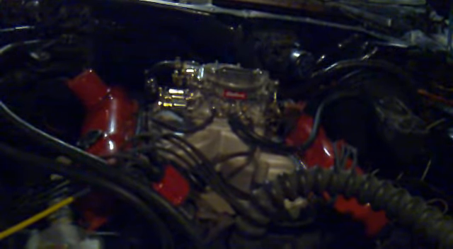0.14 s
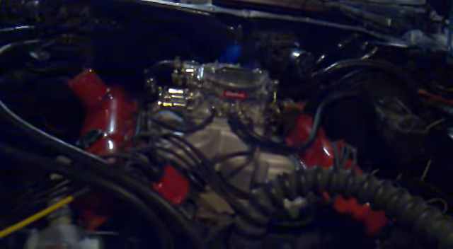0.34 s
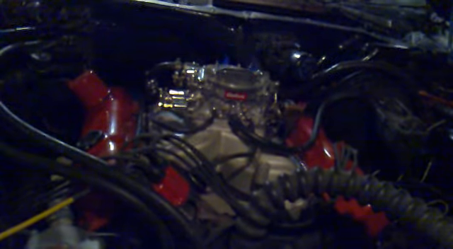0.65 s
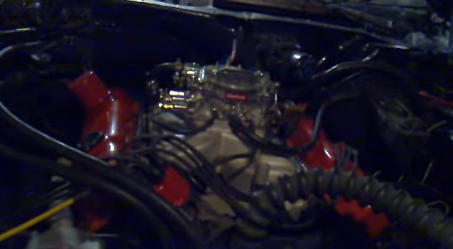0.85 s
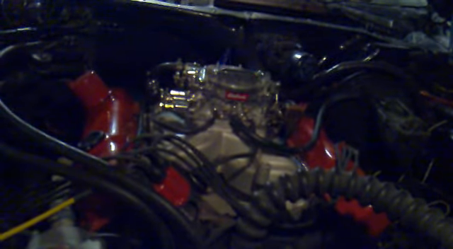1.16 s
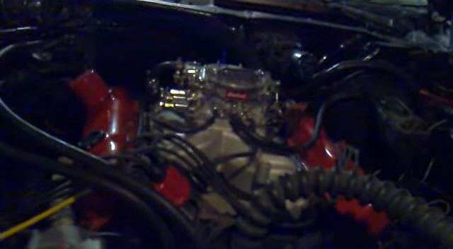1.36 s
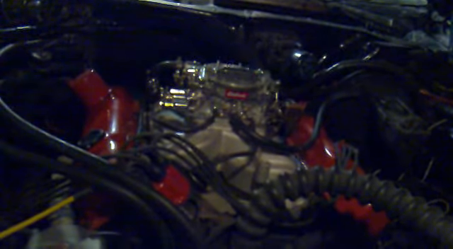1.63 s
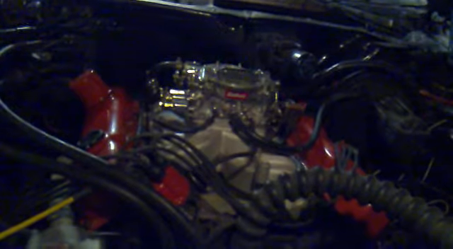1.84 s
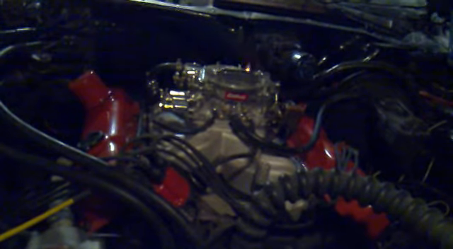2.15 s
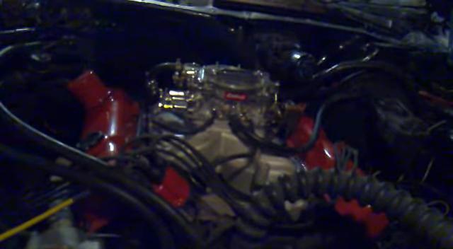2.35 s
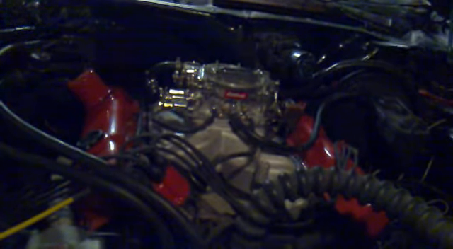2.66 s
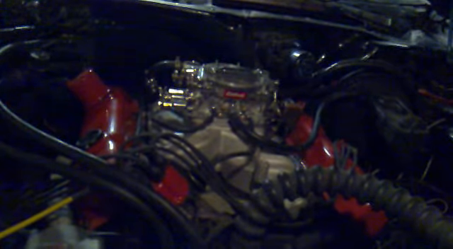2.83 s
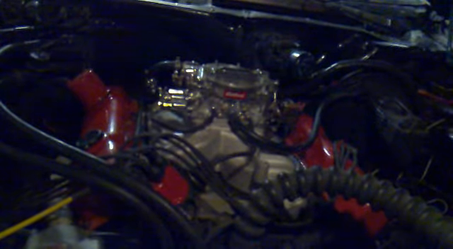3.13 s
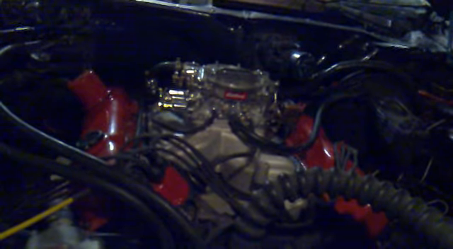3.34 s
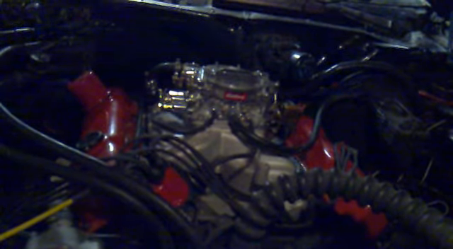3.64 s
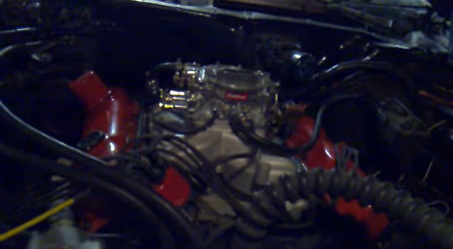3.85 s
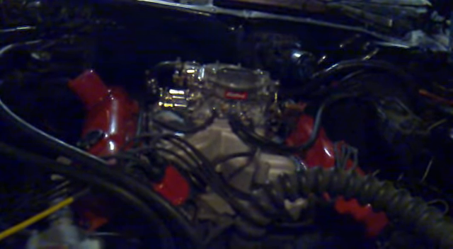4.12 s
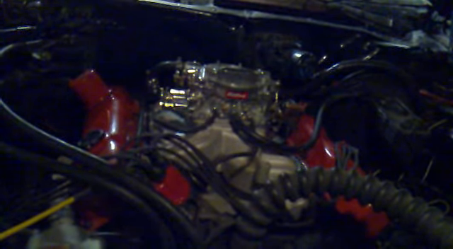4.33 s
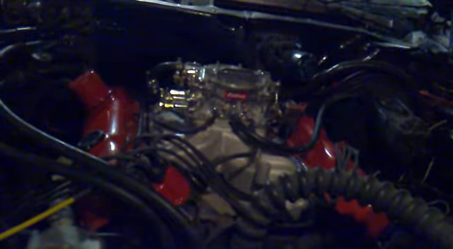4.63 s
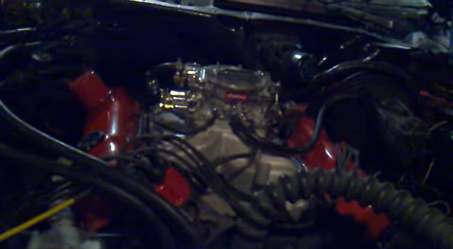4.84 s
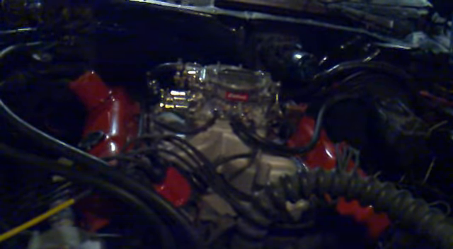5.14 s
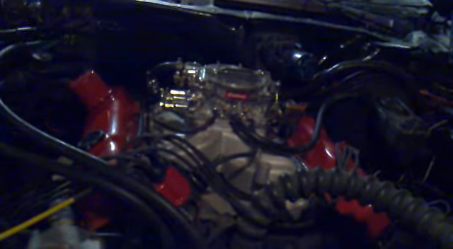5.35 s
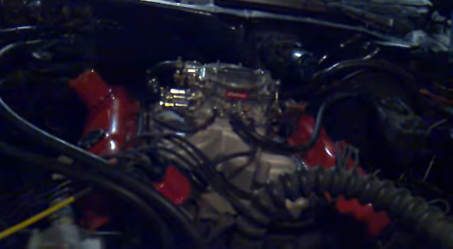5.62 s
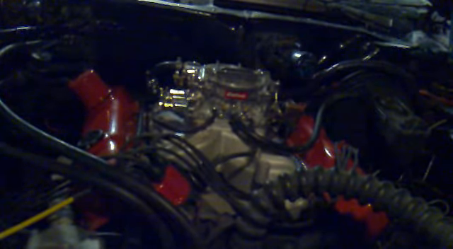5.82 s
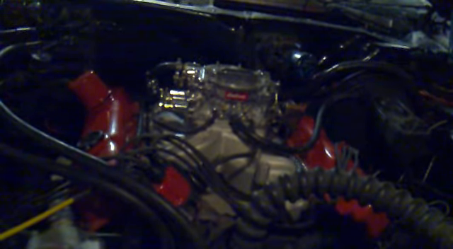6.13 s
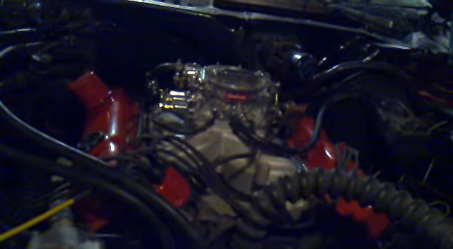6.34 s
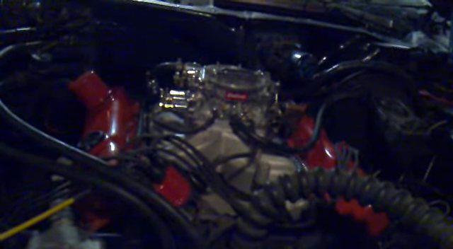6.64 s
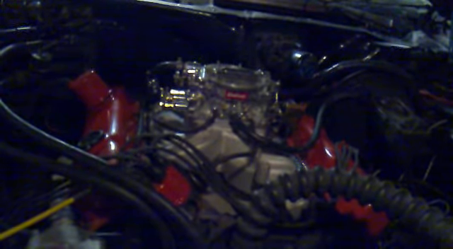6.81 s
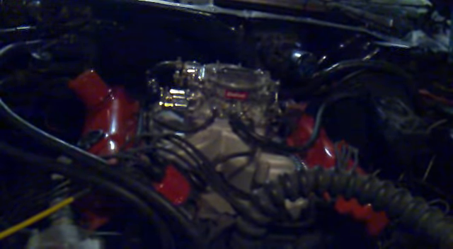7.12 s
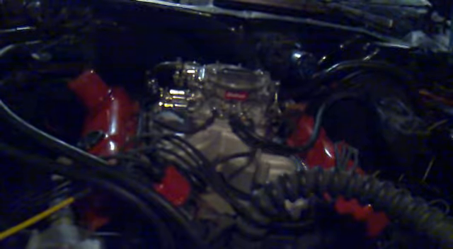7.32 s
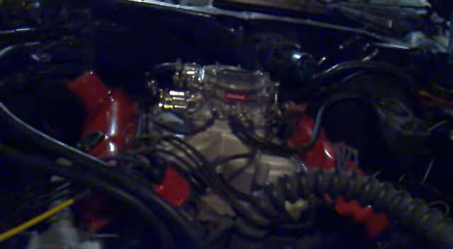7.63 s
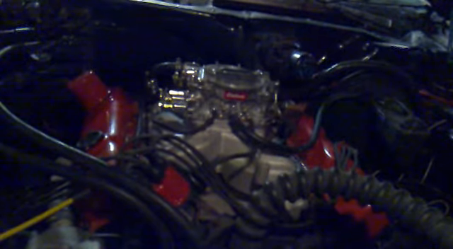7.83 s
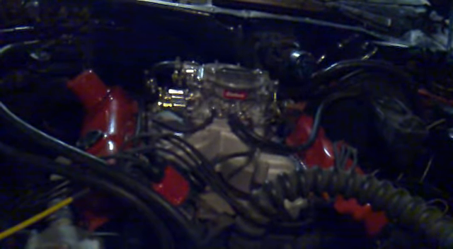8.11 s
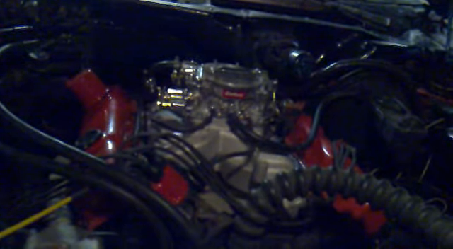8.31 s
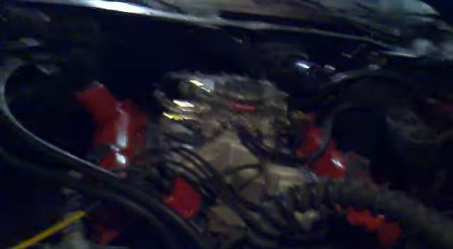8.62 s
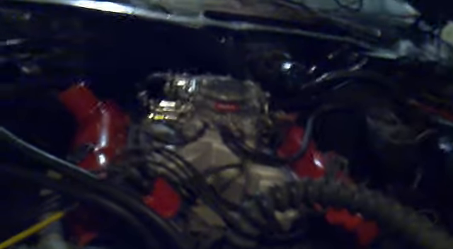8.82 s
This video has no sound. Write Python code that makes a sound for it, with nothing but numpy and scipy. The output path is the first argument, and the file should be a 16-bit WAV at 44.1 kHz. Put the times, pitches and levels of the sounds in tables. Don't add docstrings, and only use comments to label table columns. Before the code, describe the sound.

Faint garage room tone lies under a big engine's carburettor. From 0 to 1.9 s it spits quiet, separate puffs of turbulent gas with hollow throat pops, soft low flutters and a thud near 1.4 s. At about 2.05 s a charge lights: two closely packed surges become a huge low boom, strongest near 2.12 s, throaty around 300 Hz, overloading the microphone and ringing the room until roughly 2.5 s. Sound ducks, then slowly recovers. Weak hisses follow, with a breathy puff at 3.0 s and a smaller one at 3.27. At 4.0 s a sharp airy gust carries a thin, slightly sagging whistle near 3.3 kHz. Small spits and pops come at 4.8, 5.4, 5.9, 6.7 with a low thump, and a crisp one at 7.6. Near quiet follows, with a tiny pop at 8.1. From 8.6 to 8.9 s fingers tick dryly on plastic, loudest at 8.86.

```python
import sys
import numpy as np
from scipy import signal
from scipy.fft import rfft, irfft
from scipy.io import wavfile
from scipy.ndimage import uniform_filter1d, minimum_filter1d

SR = 44100
rng = np.random.default_rng(int(sys.argv[2]) if len(sys.argv) > 2 else 0)


def dump(signal):
    limited = np.clip(np.atleast_2d(signal).T, -1, 1)
    pcm = np.round(limited * 32767).astype(np.int16)
    wavfile.write(sys.argv[1], SR, pcm)


def ratio(d):
    e = np.asarray(d, float) / 20
    return 10 ** e


N = 395577
T = np.arange(N) / SR
HZ = np.fft.rfftfreq(N, 1 / SR) + 1e-3

# start_s, hold_s, rush_db, throat_rel_db, hiss_rel_db
SPITS = [(0.0, 0.0046, -53.5, -3.5, -7), (0.025, 0.15, -65.5, 10, -3.5), (0.42, 0.04, -55.5, 0, 3),
         (0.571, 0.027, -50.5, 2.5, -5), (0.624, 0.086, -54, -2, -4.5), (0.811, 0.073, -60.5, 2, -9),
         (1.273, 0.011, -57.5, -1, -11), (1.42, 0.022, -63, -3, -3), (1.611, 0.052, -68.5, 7.5, 2),
         (1.677, 0.011, -63.5, -7, -11), (2.33, 0.024, -77, -2, 12.5), (1.87, 0.021, -56.5, -3, -9),
         (1.956, .02, -62.5, -2, -5), (2.105, .012, -18.5, -1, -1.5), (2.12, 0.026, -13, 1, -5),
         (2.513, 0.012, -58, 0, -1), (2.564, 0.01, -52.5, -3.5, -3), (2.633, 0.022, -54.5, -13.5, -6),
         (4.026, 0.058, -30, -12.5, -4), (5.357, 0.0077, -63.5, 10.5, 1.5), (5.397, 0.049, -53.5, -1, -3),
         (5.933, 0.013, -47.5, -4, -2.5), (5.981, 0.071, -52, -10, -0.5), (6.804, 0.077, -62.5, 0.5, -5),
         (7.297, 0.0087, -63, -8, -2), (7.554, 0.065, -55.5, -3.5, -4.5)]
# start_s, hold_s, rush_db, throat_rel_db, hiss_rel_db
LEAKS = [(0.29, 0.15, -64.5, 0.5, -9), (0.946, 0.74, -80, 5, -19), (1.543, 0.4, -68, -4, -3.5),
         (2.372, 0.29, -62.5, 1, -0.5), (2.683, .26, -75, 4, -3.5), (2.986, .02, -67.5, -7, 0.5),
         (5.5, 0.085, -79, 6, -2), (6.14, 0.049, -74, 6, -1.5), (3.197, 0.11, -64, -3.5, 0.5),
         (3.601, .12, -75, -2.5, -8), (3.729, 0.27, -68.5, 2, -2.5), (4.357, 0.37, -76.5, 1, -8.5),
         (4.708, 0.19, -69, -2, 2), (5.144, 0.18, -74.5, -15, -2.5), (5.573, 0.21, -75.5, -4, -6),
         (6.171, 0.25, -80, -0.5, -1), (6.475, 0.14, -69.5, -6.5, -5.5), (7.097, 0.18, -70.5, -3.5, -2.5),
         (7.856, 0.075, -83.5, -5, 4)]
# start_s, climb_s, rush_db, throat_rel_db, hiss_rel_db
SWELLS = [(0.19, 0.088, -57, 2.5, -9), (0.435, 0.034, -45.5, -2, -12), (1.235, 0.026, -62.5, 3, -18),
          (2.029, 0.0082, -54, 20, -18), (0.09, 0.031, -61, 11, -10), (1.43, 0.028, -54, -2.5, -2.5),
          (2.045, 0.034, -18, 0.5, -5.5), (3.0, 0.034, -53.5, -2.5, -3), (3.066, 0.1, -50.5, -1.5, -0.5),
          (3.27, 0.1, -59, -1.5, -1.5), (3.986, 0.033, -30.5, -9, -1), (4.819, .14, -53.5, -14.5, -2.5),
          (5.87, 0.04, -51, -5, 1), (6.4, 0.026, -63, -8.5, -7.5), (6.6, 0.068, -67, -14, 0.5),
          (6.719, 0.034, -52.5, 4.5, 3), (7.606, 0.021, -46, -3.5, -7)]
GAS_FALLS = [184.5, 200, 215, 274]
# freq_hz, density_db
GAS_SPECTRUM = [(88, -50.5), (150, -12), (466, -3.5), (534, -6), (871, -6.5), (1240, -6.5), (2870, -8),
                (3550, -10), (6600, -18), (7600, -18.5), (16000, -31)]
# freq_hz, width_hz, level_db
INTAKE_MODES = [(290, 110, 3.5), (440, 25, 0.5), (615, 60, 3), (760, 40, 1), (1370, 60, 3), (1760, 55, 3),
                (2090, 15, 1), (2320, 30, 1), (3130, 90, 1.5), (3820, 50, 2), (4550, 90, 0.5),
                (5310, 35, 4), (5910, 290, 0), (6580, 90, 2)]
# freq_hz, width_hz, level_db (against the rush)
WHISTLES = [(3715, 25, -13), (2063, 150, -11), (1200, 550, -9), (630, 30, -8), (760, 110, 0),
            (890, 57, -4.5), (306, 42, -3), (315, 120, 1), (290, 100, 2.5), (3050, 630, -7)]
# start_s, end_s
WHISTLE_SPANS = [
    (4.0, 4.045),
    (4.01, 4.035),
    (4.07, 4.15),
    (.815, .86),
    (6.75, 6.85),
    (2.56, 2.6),
    (2.065, 2.095),
    (2.125, 2.18),
    (2.2, 2.42),
    (3.27, 3.38),
]
# start_s, climb_s, level_db, fall_db_per_s
RUMBLES = [(0.0, 0.03, -45, 89), (0.42, 0.014, -48.5, 67), (0.84, 0.024, -59.5, 118), (0.93, 0.44, -67, 62),
           (1.26, 0.024, -56, 150), (1.432, 0.02, -39, 254), (1.58, 0.18, -67.5, 29),
           (2.043, 0.024, -26.5, 148), (2.1, 0.042, -7.5, 122), (2.98, 0.059, -59.5, 71.5),
           (3.261, 0.03, -64.5, 36.5), (3.72, 0.035, -73, 53.5), (3.98, 0.048, -52.5, 77.5),
           (4.68, .03, -66, 198.5), (4.8, 0.037, -64.5, 79), (5.36, 0.049, -61, 122),
           (5.57, 0.036, -75, 79), (5.899, 0.041, -58.5, 83), (6.5, .15, -80.5, 59),
           (6.715, 0.045, -45.5, 188.5), (7.06, .06, -74, 150.5), (7.561, 0.07, -63.5, 149.5)]
# freq_hz, width_hz, level_db
RUMBLE_MODES = [(26.91, 5.8, 3), (41, 6.2, 0), (79.5, 26, 1.5), (112, 25, -3.5), (171, 62, -2)]
# start_s, low_mode_db, middle_mode_db, high_mode_db, lasting (share of t60)
THUDS = [(0.04, -46.5, -55.5, -52, 0.78), (1.433, -53.5, -38, -49, 0.39), (1.448, -52, -44, -46, 0.12),
         (1.501, -48, -48, -49.5, 0.56), (2.071, -31, -27, -24, 0.41), (2.122, -13.5, -20, -17, 0.39),
         (2.151, -26, -15, -12, 0.35), (2.191, -27.5, -21, -23.5, 0.62), (3.03, -57.5, -74.5, -72, 0.42),
         (6.722, -62, -56, -56, 0.19), (6.759, -67, -54, -55, 0.25), (1.441, -43, -46, -53, 0.18)]
# freq_hz, t60_s
RINGING_MODES = [(33, 1.4), (80, 1.25), (108, .6)]
# freq_hz, density_db
FLOOR_SPECTRUM = [(20, -3), (50, -1.5), (100, 0.5), (160, -11), (250, -0.5), (500, -2.5), (1000, -4.5),
                  (2000, -5.5), (4000, -7.5), (16000, -10)]
# start_s, level_db, pitch_hz, rise_s
THROBS = [(0.041, -41, 59, 0.011), (1.44, -29.5, 89.4, 0.013), (1.495, -39.5, 81, 0.016),
          (1.535, -47, 87, 0.015), (1.432, -51, 190, 0.0061), (2.115, -5.5, 85, 0.0096),
          (2.14, -7, 83, 0.014), (2.225, -17, 79, 0.012), (2.251, -20, 74, 0.017),
          (2.365, -29.5, 76, 0.019), (2.43, -38, 72, .02), (2.475, -40, 66, 0.015), (2.49, -44.5, 26, .025),
          (2.58, -45.5, 26, .022), (2.665, -51, 20, .02), (2.945, -57.5, 24, 0.015),
          (3.02, -50, 14.5, 0.031), (3.13, -59, 15, .035), (3.24, -59.5, 16, .04), (3.37, -61, 18, .03),
          (3.262, -59, 220, .012), (6.722, -42, 90, 0.013), (6.762, -45, 89, 0.011), (6.81, -55, 75, 0.011),
          (6.746, -48, 310, 0.0091), (6.77, -49.5, 355, 0.0087)]
# start_s, level_db, pitch_hz, rise_s
GULPS = [(.12, -46, 290, 0.019), (0.112, -54, 430, 0.011), (0.237, -47, 428, 0.012),
         (0.439, -45.5, 320, 0.0092), (.448, -48, 670, 0.008), (.478, -53, 486, 0.015),
         (.575, -48, 1330, 0.0054), (.598, -53, 405, 0.0096), (2.066, -13.5, 308, 0.013),
         (2.131, 2, 325, 0.0079), (2.113, -10, 426, 0.012), (2.112, -10, 570, .008),
         (2.117, -26, 774, 0.0063), (2.11, -17, 1378, 0.012), (2.187, -10.5, 125, 0.014),
         (2.07, -19, 924, 0.0096), (2.215, -16.5, 325, 0.0086), (2.16, -13, 298.1, .012),
         (2.16, -7, 445.8, .011), (3.03, -45, 1130, 0.0067), (3.03, -50, 1690, 0.009),
         (3.058, -54.5, 274, 0.013), (3.143, -53, 590, 0.018), (3.127, -51, 1630, 0.023),
         (3.263, -50.5, 308, 0.0061), (3.287, -61, 270, 0.014), (3.349, -59, 1325, 0.011),
         (4.012, -33.5, 2080, .008), (4.023, -41.5, 1520, 0.01), (4.697, -60, 649, 0.0053),
         (4.815, -58.5, 370, 0.0066), (4.835, -61, 283, .01), (5.36, -41.5, 520, 0.0059),
         (5.396, -39, 368, 0.0033), (5.402, -43.5, 760, 0.005), (5.859, -54.5, 1165, 0.0084),
         (5.862, -52.5, 688, 0.013), (3.15, -49, 906, 0.014), (8.135, -71.5, 1637, .015),
         (5.93, -43.5, 454, 0.017), (6.02, -51.5, 1760, 0.013), (6.071, -60, 1780, 0.016),
         (6.767, -40.5, 744, 0.0054), (6.808, -59.5, 760, .02), (7.541, -58, 600, .004),
         (7.573, -51.5, 2770, 0.0069), (7.628, -36, 1440, 0.0022), (7.629, -41.5, 3050, 0.0069),
         (7.644, -39, 1745, 0.0059)]
# start_s, level_db, pitch_hz, rise_s, glide_hz_per_s
GLIDES = [
    (0.74, -50, 620, 0.022, -1200),
    (2.6, -54.5, 1600, 0.011, 8999),
    (3.273, -67, 2740, 0.02, 3999),
    (2.136, -13, 160, 0.015, 2500),
]
# start_s, level_db, pitch_hz, ringing_share
POPS = [(0.11, -45, 422, 0.3), (0.257, -34.5, 412, 0.9), (0.419, -36, 408, 0.6), (0.44, -36, 1810, 0.5),
        (0.448, -31.5, 1940, 0.8), (0.575, -41, 377, 0.8), (0.576, -37, 1100, .1), (0.813, -39.5, 645, 0.3),
        (0.814, -47, 4800, 0.6), (1.24, -50, 1700, 0.3), (1.274, -30.5, 2850, 0.2), (1.276, -55, 4700, 0.7),
        (1.3, -42.5, 4430, 0.7), (1.387, -45, 2460, 0.05), (1.435, -38.5, 1800, 0), (1.869, -45, 290, 0.5),
        (3.034, -38, 1200, 0.24), (3.032, -44, 2310, .6), (3.135, -42, 990, 0.2), (3.155, -40, 650, .3),
        (3.266, -40, 290, 0.57), (3.3, -47, 3120, .4), (3.986, -21, 2160, 0), (4.8, -40, 353, 0.2),
        (5.358, -45, 517, 0.6), (5.396, -37.5, 599, 0), (5.41, -44, 1494, 0.35), (5.47, -49, 2700, 0.36),
        (5.857, -39.5, 1030, 0.3), (5.934, -29, 480, 0.23), (5.94, -22.5, 2270, 0.13),
        (6.146, -52.5, 394, 0.05), (6.41, -50, 618, 0.17), (6.717, -36.5, 391, 0.46),
        (6.738, -36.5, 1380, 0.3), (6.747, -29.5, 760, 0.33), (7.09, -46, 590, 0.02), (7.3, -49, 597, 0.29),
        (7.555, -46.5, 2700, 0.77), (7.629, -28, 1410, 0.2), (7.63, -37, 2800, 0.34),
        (8.139, -59.5, 1587, 0.62)]
# start_s, level_db, pitch_hz, ringing_share, t60_s
BLASTS = [
    (2.045, -11, 603.7, 0.4, 0.12),
    (2.07, -8.5, 600, .5, .08),
    (2.15, -8, 620, .5, .1),
    (2.075, 0.5, 296.3, 0.2, 0.028),
    (2.119, 0, 322.5, 0.01, 0.033),
    (2.128, -5, 602.3, .2, .12),
    (2.13, -8, 200, .3, .1),
    (2.162, -2, 428, 0.9, 0.073),
    (2.196, -8, 278.2, 0.8, 0.11),
]
# time_s, pitch_hz, level_db (rms)
NOTE = [
    (3.975, 3390, -62),
    (3.993, 3375, -37),
    (4.012, 3335, -42),
    (4.035, 3310, -31),
    (4.05, 3310, -38),
    (4.062, 3295, -29),
    (4.112, 3275, -37),
    (4.14, 3290, -48),
    (4.22, 3300, -66),
]
# start_s, level_db, slow_ring_hz, quick_ring_hz (also centres the crack), knock_rel_db
TICKS = [(8.5902, -39, 3120, 2050, -18), (8.593, -51, 2100, 4170, -29.5), (8.6115, -47, 3820, 6130, -19.5),
         (8.6135, -53, 2000, 2890, -6.5), (8.648, -53, 1203, 2285, 1), (8.7097, -29, 2050, 4285, -19.5),
         (8.7097, -46.5, 7500, 9600, -27.5), (8.7125, -45, 3000, 5300, -28),
         (8.7175, -51, 3000, 5800, -30.5), (8.7207, -33.5, 1900, 3600, -19), (8.7235, -44, 1900, 3400, -30),
         (8.828, -43.5, 4970, 6830, -35), (8.8555, -50, 2510, 5000, -30), (8.8574, -17.5, 3000, 3600, -30),
         (8.8574, -26.5, 7540, 4700, -25.5), (8.8605, -39, 2000, 4800, -20), (8.869, -41, 1487, 3500, -8.5),
         (8.872, -47, 900, 2790, -3.5), (8.8925, -47.5, 1300, 2900, -10), (8.8962, -32, 1630, 2600, -10.5),
         (8.9192, -41.5, 4500, 6600, -30), (8.92, -37.5, 1770, 2990, -22)]
# start_s, level_db, pitch_hz
BUMPS = [
    (8.712, -53, 55.7),
    (8.897, -52.5, 128.5),
]

BURST_DB_PER_S, SWELL_DB_PER_S = 2601, 1202.5
SWELL_DB = 10.5
LINGER_DB, AIR_LINGER_DB, LINGER_DB_PER_S = -26, -21, 89
AIR_FOLLOWS, AIR_DB, AIR_HZ = 1.9, 1.5, 8400
RING_ON_S = 0.021
CRACKLE_HZ, CRACKLE_DB = 300, 1.0
RUMBLE_DB_PER_S = 901
MODE_WANDER_HZ = 2.5
FLOOR_DB = -68.5
GULP_ROUGH, GULP_ROUGH_HZ = 0.31, 71
POP_T60_S, POP_T60_SLOPE = 0.089, 0.2
POP_RISE_S, BLAST_RISE_S = 0.0026, 0.0026
GARAGE_T60_S, GARAGE_DB = 0.33, -7.5
TICK_T60_S = 0.0091
HOLD_S, RECOVER_DB_PER_S = 0.72, 23.5
OFFSET, TOP = -0.0005, 0.712


def rms_one(x):
    return x / np.sqrt(np.mean(x ** 2) + 1e-20)


def coloured(gain):
    return rms_one(irfft(rfft(rng.standard_normal(N)) * gain, N))


def slope(points):
    hz, level_db = np.transpose(points)
    return ratio(np.interp(np.log(HZ), np.log(hz), level_db))


def humps(modes):
    power = sum(ratio(2 * level_db) / (1 + (2 * (HZ - hz) / width) ** 2) for hz, width, level_db in modes)
    return np.sqrt(power)


def between(low, high):
    return 1 / np.sqrt((1 + (low / HZ) ** 8) * (1 + (HZ / high) ** 8))


def flutter(rate, depth_db):
    return rms_one(ratio(depth_db * coloured(1 / (1 + (HZ / rate) ** 2))))


def resonate(x, hz, width):
    r = np.exp(-np.pi * width / SR)
    peak = (1 - r * r) / 2
    return signal.lfilter([peak, 0, -peak], [1, -2 * r * np.cos(2 * np.pi * hz / SR), r * r], x)


def surges(rows, linger_db=LINGER_DB):
    t, power = T[::48], 0
    for start, length, level_db, climb_db, burst, fall in rows:
        after = np.maximum(t - start - length, 0)
        rise_db = burst * np.minimum(t - start, 0)
        rise_db = rise_db - climb_db * np.clip(1 - (t - start) / max(length, 1e-3), 0, 1)
        decay = ratio(-2 * fall * after) + ratio(2 * (linger_db - LINGER_DB_PER_S * after))
        power = power + ratio(2 * (level_db + rise_db)) * decay
    return np.interp(T, t, np.sqrt(power))


def whistles(rush):
    keep = np.exp(-1 / (RING_ON_S * SR))
    rush = np.maximum(rush, signal.lfilter([1 - keep], [1, -keep], rush))
    out = np.zeros(N)
    for (start, end), (hz, width, level_db) in zip(WHISTLE_SPANS, WHISTLES):
        gate = np.interp(T, [start - .01, start, end, end + 0.027], [0, 1, 1, 0])
        tone = coloured(humps([(hz, width, 0)]) ** 2)
        tone /= np.sqrt(np.average(tone ** 2, weights=gate))
        out += rush * gate * ratio(level_db) * tone
    return out


def gusts():
    steady = SPITS + LEAKS
    start, length, rush_db, throat_db, hiss_db = np.transpose(steady + SWELLS)
    swelling = np.arange(len(start)) >= len(steady)
    climb_db = SWELL_DB * swelling
    burst = np.where(swelling, SWELL_DB_PER_S, BURST_DB_PER_S)
    relative_db = (throat_db, 0, hiss_db, AIR_FOLLOWS * hiss_db + AIR_DB)
    lingers_db = [LINGER_DB] * 3 + [AIR_LINGER_DB]
    throat, rush, hiss, air = [
        surges(zip(start, length, rush_db + rel_db, climb_db, burst, fall + 0 * start), linger_db)
        for rel_db, fall, linger_db in zip(relative_db, GAS_FALLS, lingers_db)]
    colour = slope(GAS_SPECTRUM) * np.sqrt(1 + humps(INTAKE_MODES) ** 2)
    shared = flutter(25, .6)
    low, middle, high = [shared * flutter(34, 1.2) * coloured(colour * between(*edges))
                         for edges in ((200, 1000), (1000, 4500), (4500, 16000))]
    top = signal.sosfiltfilt(signal.butter(2, AIR_HZ, "high", fs=SR, output="sos"), high)
    gas = throat * low + rush * middle + hiss * (high - top) + air * top
    return (gas + whistles(rush)) * flutter(CRACKLE_HZ, CRACKLE_DB)


def thuds():
    rows = [(start, climb, level_db - 4.5, SWELL_DB, RUMBLE_DB_PER_S, fall)
            for start, climb, level_db, fall in RUMBLES]
    out = surges(rows) * coloured(humps(RUMBLE_MODES) * between(13, 220))
    beats = [flutter(16, 4.0) for mode in RINGING_MODES]
    drifts = [MODE_WANDER_HZ * coloured(1 / (1 + (HZ / 12) ** 2)) for mode in RINGING_MODES]
    t = T[:SR]
    for start, *modes_db, lasting in THUDS:
        i = int(start * SR)
        for (hz, t60), mode_db, beat, drift in zip(RINGING_MODES, modes_db, beats, drifts):
            shape = (1 - np.exp(-t / 0.0021)) * ratio(mode_db - 60 * t / (t60 * lasting))
            cycles = hz * t + np.cumsum(drift[i:i + SR]) / SR
            out[i:i + SR] += shape * beat[i:i + SR] * np.sin(2 * np.pi * cycles)
    return out


def quiet_room():
    return ratio(FLOOR_DB) * coloured(slope(FLOOR_SPECTRUM))


def gulps():
    out = np.zeros(N)
    steady = [(*ring, 0) for ring in GULPS + THROBS]
    for start, level_db, hz, rise, glide in steady + GLIDES:
        i, t = int(start * SR), T[:int(5 * rise * SR)]
        shape = t / rise * np.exp(.5 - .5 * (t / rise) ** 2)
        out[i:i + len(t)] += ratio(level_db) * shape * np.sin(2 * np.pi * (hz + .5 * glide * t) * t)
    lowpass = signal.butter(2, GULP_ROUGH_HZ, fs=SR, output="sos")
    eddies = rms_one(signal.sosfilt(lowpass, rng.standard_normal(N)))
    return out * (1 + GULP_ROUGH * eddies) / np.sqrt(1 + GULP_ROUGH ** 2)


def pops_and_blasts():
    events = [(*pop, POP_T60_S * (pop[2] / 1000) ** POP_T60_SLOPE, POP_RISE_S) for pop in POPS]
    events += [(*blast, BLAST_RISE_S) for blast in BLASTS]
    out, white = np.zeros(N), rng.standard_normal(N)
    for start, level_db, hz, share, t60, rise in events:
        i = int(start * SR)
        t = T[:min(int(t60 * SR) + 64, N - i)]
        puff = white[i:i + len(t)]
        narrow, wide = hz / 3.3, hz * 0.89
        rung = rms_one(resonate(resonate(puff, hz, narrow), hz, narrow))
        broad = rms_one(resonate(resonate(puff, hz, wide), hz, wide))
        shape = (1 - np.exp(-t / max(rise, 1e-4))) * ratio(-60 * t / t60)
        out[i:i + len(t)] += ratio(level_db - 8) * shape * (share * rung + (1 - share) * broad)
    return out


def garage(x):
    t = T[:int(.6 * SR)]
    white = rng.standard_normal(len(t))
    dull = signal.lfilter([.3], [1, -.7], white)
    tail = dull * ratio(-60 * t / GARAGE_T60_S) + .5 * white * ratio(-80 * t / GARAGE_T60_S)
    tail = tail * (t > .006)
    return signal.fftconvolve(x, tail / np.sqrt(np.sum(tail ** 2)))[:N]


def note():
    time, hz, level_db = np.transpose(NOTE)
    phase = 2 * np.pi * np.cumsum(np.interp(T, time, hz)) / SR
    level = np.sqrt(2) * ratio(np.interp(T, time, level_db, -150, -150))
    return level * flutter(30, 1.5) * np.sin(phase)


def ticks():
    out, push = np.zeros(N), np.zeros(N)
    t = T[:1024]
    onset = 1 - np.exp(-t / .0002)
    for start, level_db, slow_ring_hz, quick_ring_hz, knock_db in TICKS:
        i = int(start * SR)
        rings = np.sin(2 * np.pi * slow_ring_hz * t) * ratio(-15 * t / TICK_T60_S)
        rings += 0.71 * np.sin(2 * np.pi * quick_ring_hz * t) * ratio(-30 * t / TICK_T60_S)
        crack = resonate(rng.standard_normal(1024), 0.46 * quick_ring_hz, 1.5 * quick_ring_hz)
        crack = rms_one(resonate(crack, 0.47 * quick_ring_hz, 1.4 * quick_ring_hz))
        crack = 0.57 * crack * ratio(-40 * t / TICK_T60_S)
        out[i:i + len(t)] += ratio(level_db - 1.6 - 60 * t / TICK_T60_S) * onset * (rings + crack)
        push[i] = ratio(level_db + knock_db)
    for start, level_db, hz in BUMPS:
        since = np.maximum(T - start, 0)
        out += ratio(level_db - 60 * since / 0.074) * np.sin(2 * np.pi * hz * since)
    rub = np.interp(T, [8.74, 8.755, 8.78, 8.8, 8.87, 8.9, 8.93, 8.96], [0, 1, .8, 0, 0, .9, .8, 0])
    out += ratio(-67.5) * rub * flutter(60, 3.4) * coloured(between(2480, 5100))
    knocks = 40 * resonate(resonate(push + 1e-18, 575, 250), 530, 870)
    return out + knocks


def scene():
    pops = pops_and_blasts()
    echo = ratio(GARAGE_DB) * garage(pops)
    mix = gusts() + thuds() + quiet_room() + gulps() + pops + echo + note() + ticks()
    return mix[None]


def top_cut(x):
    return signal.sosfilt(signal.butter(12, 15790, fs=SR, output="sos"), x)


def record(dry):
    level_db = 10 * np.log10(uniform_filter1d(dry[0] ** 2, size=441) + 1e-12)
    back_db, hold = RECOVER_DB_PER_S * T, int(HOLD_S * SR)
    over_db = np.pad(0.22 * np.maximum(level_db + 22, 0), (hold, 0))
    held_db = -minimum_filter1d(-over_db, size=hold)[hold - hold // 2:][:N]
    duck_db = np.maximum.accumulate(held_db + back_db) - back_db
    x = dry * ratio(-uniform_filter1d(duck_db, size=441))
    x = x / (1 + np.abs(x / TOP) ** 16) ** (1 / 16) + OFFSET
    return top_cut(x)


dry = scene()
out = record(dry)
dump(out)
```